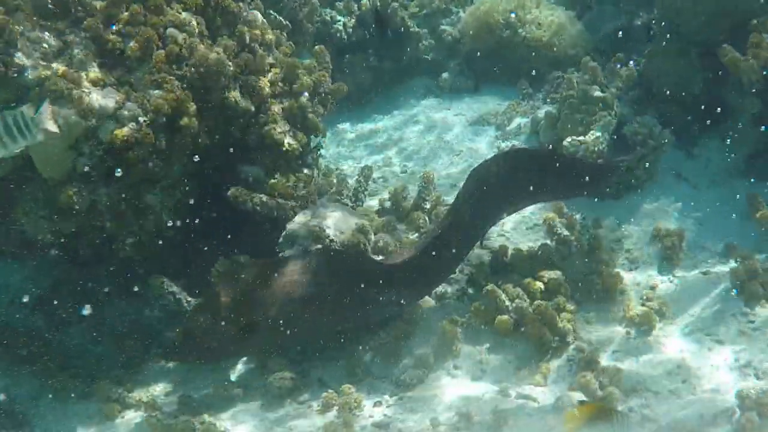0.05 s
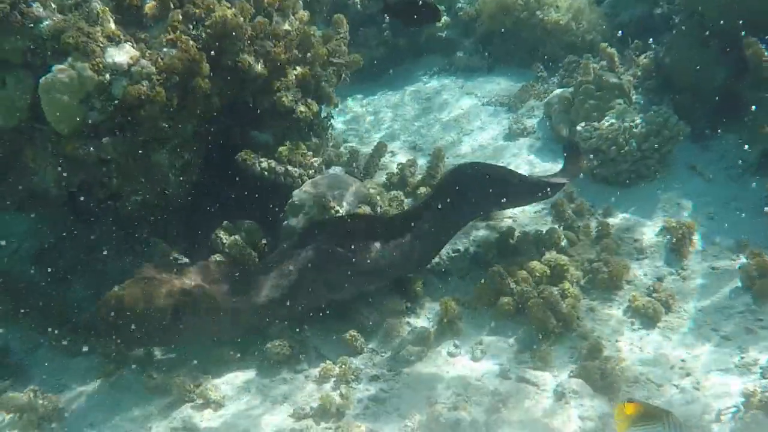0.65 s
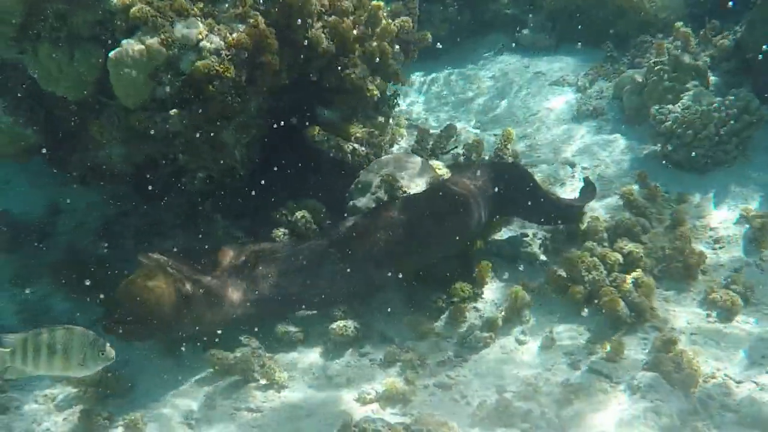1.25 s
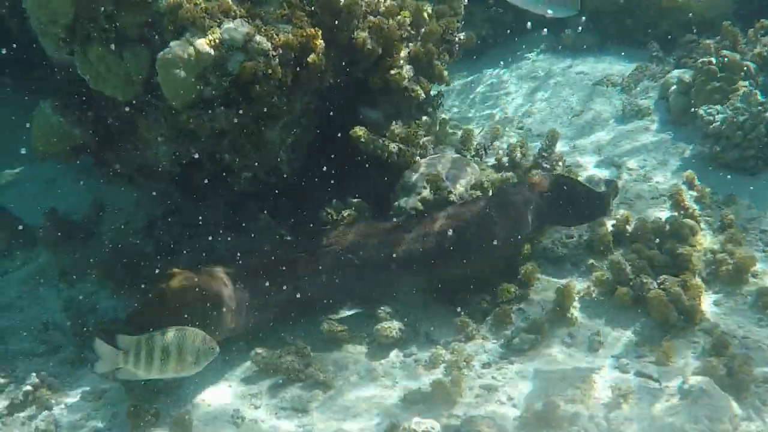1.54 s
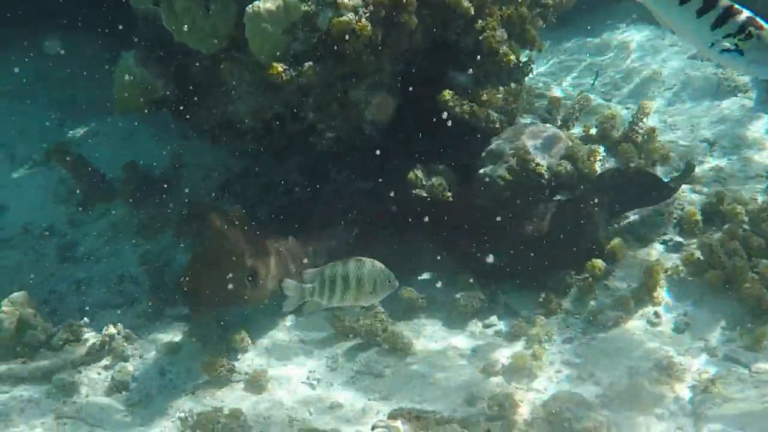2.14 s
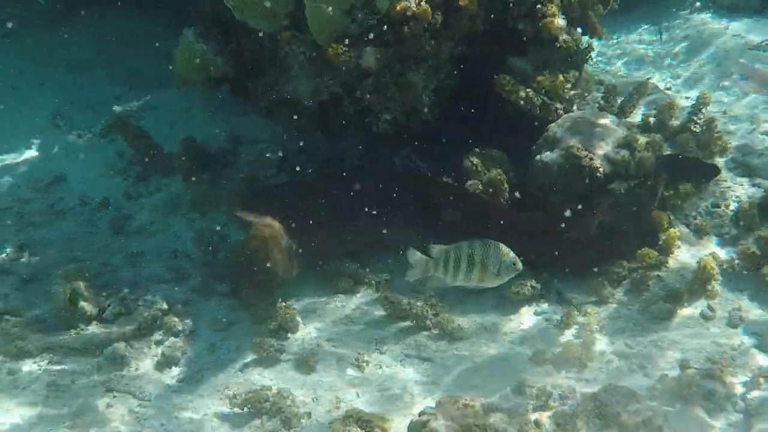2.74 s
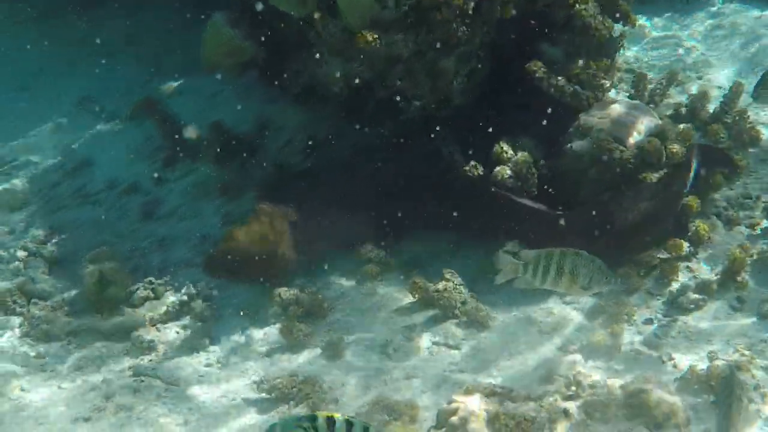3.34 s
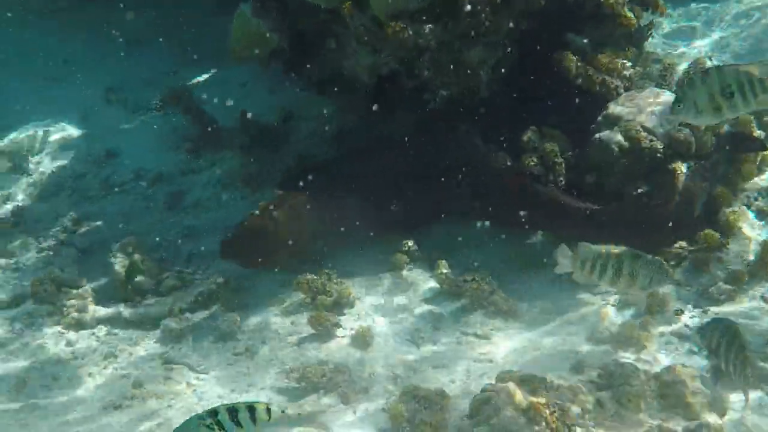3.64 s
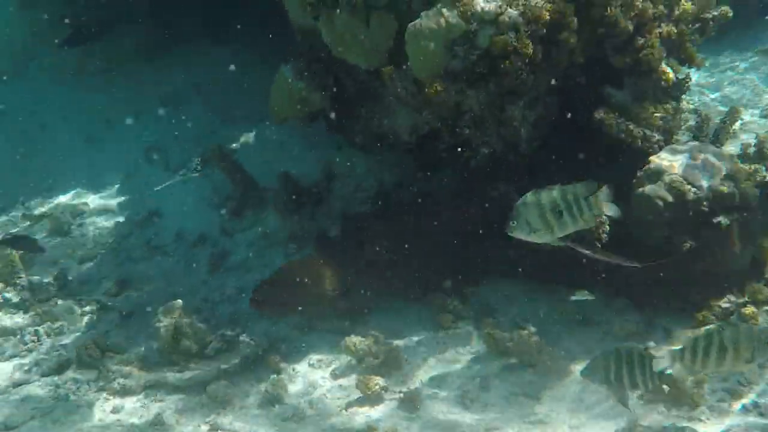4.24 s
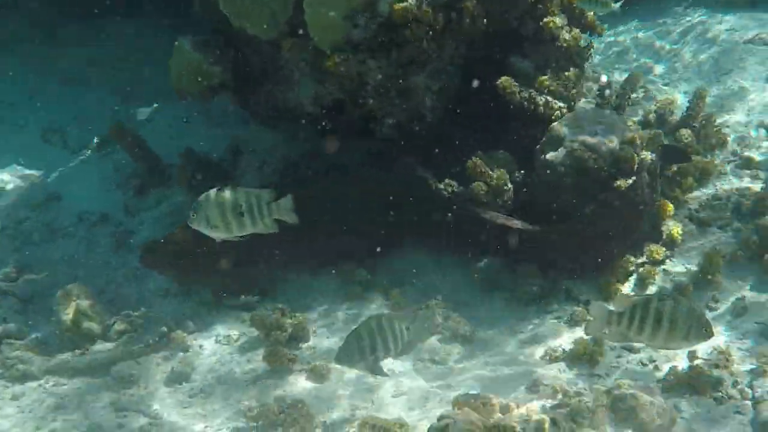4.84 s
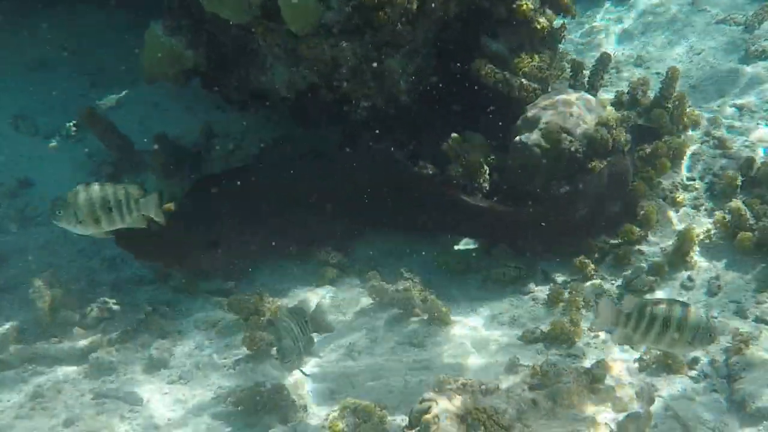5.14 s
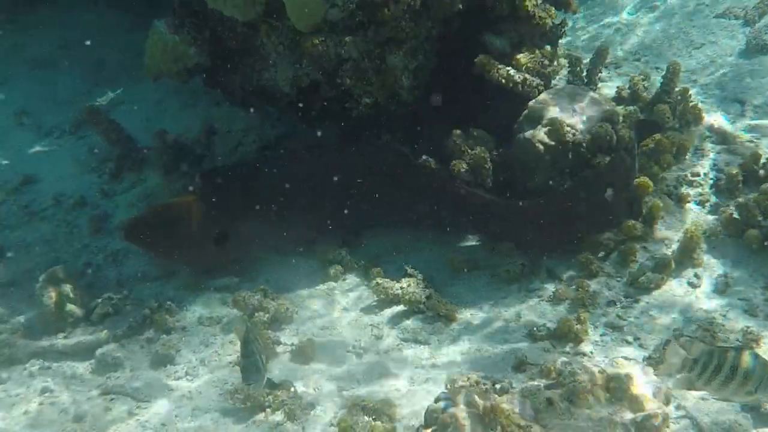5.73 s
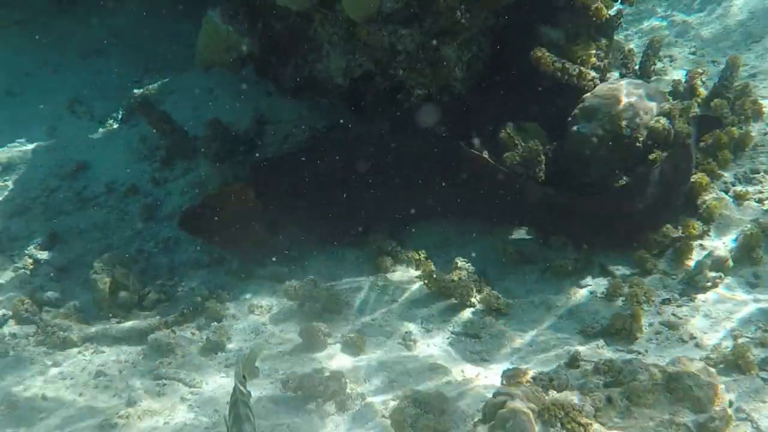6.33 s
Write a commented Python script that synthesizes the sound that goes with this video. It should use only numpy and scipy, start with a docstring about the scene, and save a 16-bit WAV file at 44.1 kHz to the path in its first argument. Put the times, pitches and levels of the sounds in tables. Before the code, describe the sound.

Muffled water surges and rumbles against an underwater camera case, with gulping air pockets, small fizzing bubbles and one sharp knock.

```python
"""Water pressing and washing against a waterproof camera case, adrift just under the surface over a reef.
The microphone sits inside the case, which muffles the surges. Air pockets gulp right against it; small
bubbles blip close by, fizz in clouds and briefly trickle on one note. Knocks ring the case and a wet grip
squeaks on it. One hard knock makes the limiter duck the recorder's hiss."""
import sys
import numpy as np
from scipy import signal
from scipy.fft import rfft, irfft
from scipy.io import wavfile
from scipy.ndimage import uniform_filter1d

SR = 44100
rng = np.random.default_rng(int(sys.argv[2]) if len(sys.argv) > 2 else 0)


def bounce(signal):
    """Save signal as a 16-bit WAV file at the path given by the first command-line argument."""
    frames = np.transpose(np.atleast_2d(signal))
    limited = np.clip(frames, -1, 1)
    pcm = np.round(limited * 32767).astype(np.int16)
    wavfile.write(sys.argv[1], SR, pcm)


N = 285768
TIME = np.arange(N) / SR

# upper band of churning water, heard through the case: frequency_hz, density_db
SPLASH_COLOUR = [(250, -3), (340, 1.5), (450, 7), (540, -2.5), (700, -6.5), (1000, -23.5), (1500, -27),
                 (2200, -45), (3200, -71)]


def sway(eddy_gain_db=4.5, heave_db=-23):
    """Eddies push on the case, over the deep heave of the waves."""
    # slow water pressure on the case: time_s, level_db
    pressure = [(0, -23.5), (0.13, -16.5), (0.33, -31.5), (0.52, -39), (0.75, -24), (1.17, -28),
                (1.55, -36.5), (1.92, -17.5), (2.06, -35.5), (2.65, -24.5), (3.2, -32), (3.7, -32.5),
                (4.2, -28.5), (4.5, -19), (4.96, -22.5), (5.1, -37), (5.8, -42), (6.48, -31)]
    # rumble of the eddies: frequency_hz, density_db
    eddy_colour = [(12, -8.5), (22, 10), (35, -2), (50, -13), (70, -20.5), (110, -34), (250, -36)]
    # heave of the waves: frequency_hz, density_db
    heave_colour = [(3, -2), (7, -5.5), (12, -9), (18, -29.5), (26, -18)]
    level_db, = in_time(pressure)
    eddies = evened(noise(eddy_colour), span_s=0.021)
    heave = evened(noise(heave_colour), span_s=0.78)
    return from_db(level_db + eddy_gain_db) * eddies + from_db(heave_db) * heave


def surges(calm_deep_db=-44, calm_upper_db=-53.5, drop_db=9, roundness=1.56, ebb_ratio=0.76):
    """Gains of the deep and upper wash: each surge swells out of calm water and ebbs a little faster."""
    # surges over the case, drop_db down at rise_s before the crest: crest_s, level_db, rise_s, bright_db
    crests = [(0.137, -25, 0.07, -19), (0.485, -37.5, 0.11, -11.5), (0.7, -38.5, 0.13, -7),
              (1.171, -28, 0.13, -8), (1.451, -20.5, 0.07, -11), (1.564, -37, 0.13, -3),
              (2.477, -32, 0.27, -12.5), (2.533, -26, 0.02, 0), (2.679, -22.5, 0.066, -21),
              (2.76, -27, 0.038, -12), (3.017, -31.5, 0.045, -5), (3.206, -34, 0.035, -4),
              (3.346, -30, 0.13, -14.5), (3.566, -37, 0.19, -10.5), (3.909, -24, 0.067, -13),
              (4.037, -30.5, .04, -19), (4.2, -31.5, 0.068, -2.5), (4.472, -31, 0.3, -23),
              (4.587, -32, 0.17, -4), (4.813, -36, 0.033, -18), (5.203, -25, 0.095, -8.5),
              (5.46, -30, .18, -10), (5.744, -34.5, 0.14, -14), (5.948, -32.5, 0.067, -3.5),
              (6.05, -35, .08, -35), (6.277, -37, 0.17, -12.5)]
    deep_power, upper_power = from_db(calm_deep_db) ** 2, from_db(calm_upper_db) ** 2
    for crest_s, level_db, rise_s, bright_db in crests:
        from_crest = np.maximum(crest_s - TIME, (TIME - crest_s) / ebb_ratio) / rise_s
        power = from_db(level_db - drop_db * np.minimum(from_crest, 10) ** roundness) ** 2
        deep_power += power
        upper_power += power * from_db(bright_db) ** 2
    return np.sqrt(deep_power), np.sqrt(upper_power)


def wash():
    """Water churns over the case and reaches the microphone muffled, in a deep and an upper band."""
    # deep band of churning water: frequency_hz, density_db
    deep_colour = [(60, -4), (105, -0.5), (145, 2), (200, -0.5), (290, -3), (350, -13), (450, -24.5),
                   (800, -34.5)]
    deep_gain, upper_gain = surges()
    deep = evened(noise(deep_colour), span_s=0.17)
    upper = evened(noise(SPLASH_COLOUR), span_s=0.061)
    return deep_gain * deep + upper_gain * upper


def gulps(splash_db=-16, splash_time_ratio=0.76):
    """Large air pockets throb for a few cycles, each with a quicker splash."""
    # air pockets right at the case: start_s, peak_db, pitch_hz, swell_s
    pockets = [(0.1, -15.5, 204, 0.0041), (0.145, -16, 191, 0.0092), (0.205, -10, 185, 0.0027),
               (1.209, -22.5, 157, 0.015), (1.339, -18.5, 203, .0022), (1.394, -11, 162, 0.0021),
               (1.425, -9, 320, 0.0027), (1.426, -7, 124, 0.0063), (1.467, -11, 148, 0.0073),
               (2.525, -10.5, 187, 0.0058), (2.653, -5, 179, .004), (2.66, -17.5, 277, .0045),
               (2.77, -21.5, 385, 0.011), (2.783, -13.5, 161, 0.0062), (3, -21.5, 212, 0.0066),
               (3.307, -22.5, 151, 0.0074), (3.365, -19.5, 160, 0.0082), (3.37, -24.5, 300, 0.007),
               (3.875, -12, 274, 0.0057), (3.887, -13, 157, 0.011), (3.9, -15, 293, 0.0086),
               (3.911, -14, 172, 0.01), (4.184, -18, 156.5, 0.015), (4.449, -17.5, 148.5, 0.016),
               (4.46, -19.5, 246, 0.0076), (4.621, -21, 258, 0.0083), (5.179, -21.5, 159, 0.013),
               (5.442, -25.5, 256, 0.0078), (5.915, -30, 380, 0.0067), (6.261, -22, 423, 0.0042)]
    tones, splash_gain = np.zeros(N), np.zeros(N)
    for start_s, peak_db, pitch_hz, swell_s in pockets:
        add(tones, start_s, from_db(peak_db) * bubble(pitch_hz, swell_s, glide=0.0015))
        splash = from_db(peak_db + splash_db) * swell(splash_time_ratio * swell_s)
        add(splash_gain, start_s + swell_s / 2, splash)
    return tones + splash_gain * evened(noise(SPLASH_COLOUR), span_s=0.014)


def knocks(crack_db=-37, crack_decay_s=0.0028):
    """A knock on the case gives a brief crack, a tick of the wall and a thud of the heavy body."""
    # contacts on the case: start_s, tick_db, body_db
    contacts = [(0.424, -15.5, -27), (0.429, -14.5, -26), (0.4309, -17.5, -33), (0.535, -27.5, -57),
                (1.0016, -26.5, -38), (1.808, -23.5, -47), (1.943, -2.5, 4.5), (2.199, -28, -10),
                (5.061, -56, -18)]
    # modes of the wall: pitch_hz, gain_db, t60_s
    wall_modes = [(734, -7.5, 0.0051), (940, -16, 0.01), (1100, -24.5, 0.0036), (1510, 0, 0.008),
                  (2200, -67, 0.0044), (5650, -12, 0.0034)]
    # modes of the whole case: pitch_hz, gain_db, t60_s
    body_modes = [(58.7, -4, 0.086), (151, -1, 0.03), (257, -2, 0.046), (428, 3, 0.0082)]
    starts_s, tick_db, body_db = np.transpose(contacts)
    crack_gain = np.zeros(N)
    for start_s, level_db in zip(starts_s, tick_db):
        add(crack_gain, start_s, from_db(level_db + crack_db) * np.exp(-TIME[:SR // 50] / crack_decay_s))
    crack_band = signal.butter(2, [2500, 8500], "band", fs=SR, output="sos")
    crack = signal.sosfilt(crack_band, crack_gain * rng.standard_normal(N))
    tick = struck(starts_s, tick_db, wall_modes, lowpass_hz=1650)
    thud = struck(starts_s, body_db, body_modes, lowpass_hz=445)
    return crack + tick + thud


def blips(swell_cycles=6):
    """Single small bubbles ring close to the microphone."""
    # nearby bubbles: start_s, peak_db, pitch_hz
    near_bubbles = [(0.064, -31, 943), (0.237, -36, 1610), (0.315, -33, 1565), (0.773, -37.5, 922),
                    (0.858, -36, 1570), (1.667, -36.5, 1540), (1.702, -35.5, 876), (1.807, -37.5, 1760),
                    (1.824, -29.5, 947), (2.001, -33.5, 640), (2.151, -33, 727), (2.318, -32.5, 750),
                    (2.594, -34, 1590), (2.617, -33, 920), (2.667, -35, 1640), (3.246, -40.5, 1780),
                    (3.598, -37, 1500), (3.677, -42, 930), (4.003, -38.5, 1720), (4.55, -35, 1740),
                    (5.225, -30.5, 1730), (5.306, -33.5, 1700), (6.079, -36.5, 1810)]
    out = np.zeros(N)
    for start_s, peak_db, pitch_hz in near_bubbles:
        add(out, start_s, from_db(peak_db) * bubble(pitch_hz, swell_cycles / pitch_hz, glide=0.0033))
    return out


def fizz(lower_hz=912, lower_trim_db=-8, upper_trim_db=-6, froth_db=-54.5):
    """Two clouds of small bubbles come in flurries, over a smooth froth that follows the upper cloud."""
    # rise and fall of the two clouds: time_s, lower_db, upper_db
    cloud_levels = [(0, -37.5, -43.5), (0.33, -37.5, -41.5), (0.55, -49.5, -50), (1.3, -47, -50),
                    (2.1, -47.5, -45), (2.29, -33.5, -48), (2.62, -42.5, -45), (3.0, -50, -48),
                    (3.5, -53.5, -52), (4.15, -49, -45.5), (4.55, -48, -48), (4.92, -61, -56),
                    (5.25, -51, -45.5), (5.7, -47, -49.5), (6.48, -56, -59)]
    # centre pitch of the upper cloud: time_s, pitch_hz
    upper_pitch = [(0, 1470), (1.9, 1568), (2.7, 1587), (3.6, 1717), (6.48, 1659)]
    # froth: frequency_hz, density_db
    froth_colour = [(400, -8.5), (650, 4), (900, 2), (1100, -5), (1400, -2.5), (1700, -13), (2000, -7),
                    (2500, -18.5), (3300, -28.5), (5000, -81)]
    lower_db, upper_db = in_time(cloud_levels)
    upper_hz, = in_time(upper_pitch)
    stir_db = flurry()
    lower_gain = from_db(lower_db + lower_trim_db + flurry())
    upper_gain = from_db(upper_db + upper_trim_db + stir_db)
    froth_gain = from_db(froth_db + 0.95 * (upper_db - upper_db.mean() + stir_db))
    lower = cloud(np.full(N, lower_hz), spread=0.041, swell_s=0.01, scatter_db=-1, count=1100)
    upper = cloud(upper_hz, spread=0.047, swell_s=0.0041, scatter_db=4, count=1400)
    return lower_gain * lower + upper_gain * upper + froth_gain * noise(froth_colour)


def squeaks(fade_s=0.011):
    """A wet grip sticks and slips, making a row of harmonics coloured by the wall of the case."""
    # rubs on the case: loudest_s, slip_hz, glide_hz_per_s, level_db
    rubs = [(0.237, 530, 699, -42.5), (0.318, 555, -500, -42), (0.588, 795, -600, -46)]
    # response of the wall: frequency_hz, gain_db
    wall_response = [(550, -33), (800, 8.5), (1130, -20), (1600, 8), (2200, -15), (2800, -23), (3200, -27)]
    wall_hz, wall_db = np.transpose(wall_response)
    out = np.zeros(N)
    for loudest_s, slip_hz, glide_hz_per_s, level_db in rubs:
        sounding = np.abs(TIME - loudest_s) < 10 * fade_s
        offset_s = TIME[sounding] - loudest_s
        pitch_hz = slip_hz + glide_hz_per_s * offset_s
        phase = 2 * np.pi * np.cumsum(pitch_hz) / SR
        envelope = np.exp(-np.abs(offset_s) / fade_s)
        for harmonic in range(1, 7):
            gain = from_db(level_db + np.interp(harmonic * pitch_hz, wall_hz, wall_db))
            out[sounding] += envelope * gain * np.sin(harmonic * phase)
    return out


def trickle(start_s=5.4, end_s=5.87, fade_s=0.11, pitch_hz=635, level_db=-48.5):
    """A stream of larger bubbles sets in, holds one hollow note and dies away."""
    outside_s = np.abs(TIME - np.clip(TIME, start_s, end_s))
    gain = from_db(level_db) * np.exp(-outside_s / fade_s)
    return gain * cloud(np.full(N, pitch_hz), spread=0.018, swell_s=0.012, scatter_db=2, count=900)


def hiss(level_db=-54.5):
    """The recorder's own steady noise, behind everything else."""
    # noise floor: frequency_hz, density_db
    hiss_colour = [(1500, 3), (3300, -15.5), (4500, -10.5), (5800, -8), (7200, -10.5), (8500, -3),
                   (9600, -3), (11000, -7.5), (13000, -15), (14200, -21), (15300, -37)]
    return from_db(level_db) * noise(hiss_colour)


def bubble(pitch_hz, swell_s, glide):
    """Trapped air pulsates; nearing the surface, its pitch rises by the fraction glide per swell time."""
    envelope = swell(swell_s)
    rising_hz = pitch_hz * (1 + glide * np.linspace(-1, 9, len(envelope)))
    return envelope * np.sin(2 * np.pi * (np.cumsum(rising_hz) / SR + rng.random()))


def cloud(centre_hz, spread, swell_s, scatter_db, count):
    """Bubbles of nearly one size, born at random moments; running level 1."""
    out = np.zeros(N)
    starts_s = rng.uniform(0, N / SR, count)
    for start_s, (detune, strength) in zip(starts_s, rng.standard_normal((count, 2))):
        pitch_hz = centre_hz[int(start_s * SR)] * np.exp(spread * detune)
        gain = from_db(scatter_db * min(strength, 2))
        add(out, start_s, gain * bubble(pitch_hz, swell_s, glide=0.0011))
    return evened(out, span_s=0.155)


def flurry(depth_db=2.3, top_rate_hz=8.8):
    """Slow random rise and fall of a bubble cloud's level, in dB."""
    return depth_db * noise([(2, 0), (top_rate_hz, 0)])


def swell(swell_s):
    """Envelope that peaks at 1 after swell_s (at least 1 ms) and dies more slowly."""
    swell_s = max(swell_s, 0.001)
    age = TIME[:int(10 * swell_s * SR)] / swell_s
    return (age * np.exp(1 - age)) ** 2


def struck(starts_s, levels_db, modes, lowpass_hz):
    """Blows ring a set of modes as decaying sines; the contact time softens the treble."""
    clicks, ringing = np.zeros(N), np.zeros(N)
    for start_s, level_db in zip(starts_s, levels_db):
        add(clicks, start_s, from_db([level_db]))
    for k, (pitch_hz, gain_db, t60_s) in enumerate(modes):
        decay, angle = from_db(-60 / (t60_s * SR)), 2 * np.pi * pitch_hz / SR
        poles = [1, -2 * decay * np.cos(angle), decay ** 2]
        mode = signal.lfilter([0, np.sin(angle)], poles, clicks + 1e-18)
        ringing += (-1) ** k * from_db(gain_db) * mode   # neighbouring modes start in opposite directions
    return signal.sosfilt(signal.butter(2, lowpass_hz, fs=SR, output="sos"), ringing)


def noise(colour):
    """Noise with the spectrum of a (frequency_hz, density_db) table, falling away past its top; rms 1."""
    hz, db = np.transpose(colour)
    bins_hz = np.maximum(np.arange(N // 2 + 1) * SR / N, 1)
    gain = from_db(np.interp(np.log(bins_hz), np.log(hz), db))
    band_edges = (bins_hz > hz[0] / 2) * np.minimum(hz[-1] / bins_hz, 1) ** 4
    shaped = irfft(rfft(rng.standard_normal(N)) * gain * band_edges, N)
    return shaped / np.sqrt(np.mean(shaped ** 2) + 1e-20)


def evened(x, span_s):
    """Hold the running level of a noise at 1."""
    return x / np.sqrt(uniform_filter1d(x ** 2, int(span_s * SR)) + 1e-9)


def from_db(db):
    """Decibels to gain."""
    return 10 ** (np.asarray(db) / 20)


def in_time(rows):
    """Each column of a curve, at every sample."""
    times_s, *columns = np.transpose(rows)
    return [np.interp(TIME, times_s, column) for column in columns]


def add(out, start_s, sound):
    """Mix a sound in at start_s."""
    at = int(np.clip(round(start_s * SR), 0, N - 1))
    out[at:at + len(sound)] += sound[:N - at]


def limiter(x, threshold_db=0.5, attack_s=0.0021, release_s=0.11):
    """Peaks over the threshold pull the gain down just ahead of them; it creeps back."""
    over_db = np.maximum(20 * np.log10(np.abs(x) + 1e-9) - threshold_db, 1e-9)
    release = TIME / release_s
    cut_db = np.exp(np.maximum.accumulate(np.log(over_db) + release, axis=-1) - release)   # decaying hold
    return x * from_db(-uniform_filter1d(cut_db, int(attack_s * SR), axis=-1))


def scene():
    """Water, case and hiss at the one microphone, in mono."""
    noise_floor = hiss()
    water = sway() + wash() + gulps() + trickle() + fizz() + blips()
    return (water + knocks() + squeaks() + noise_floor)[None]


def record(dry, ceiling=0.96, cutoff_hz=15300):
    """The recorder limits, clips just under full scale and cuts off the top treble."""
    clipped = np.clip(limiter(dry), -ceiling, ceiling)
    return signal.sosfilt(signal.ellip(10, 0.1, 80, cutoff_hz, fs=SR, output="sos"), clipped)


dry = scene()
out = record(dry)
bounce(out)
```